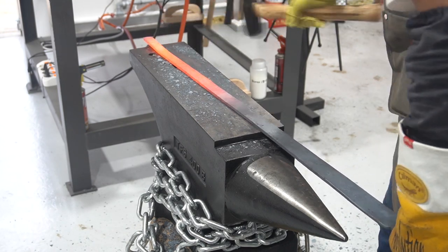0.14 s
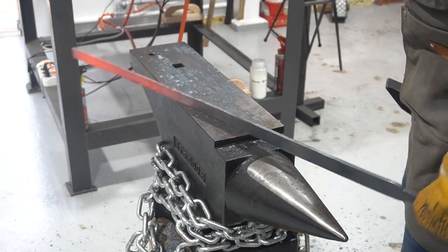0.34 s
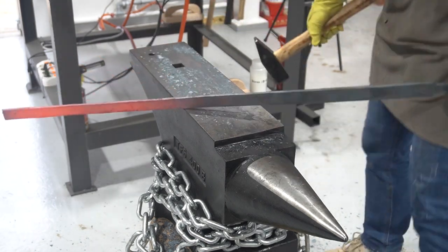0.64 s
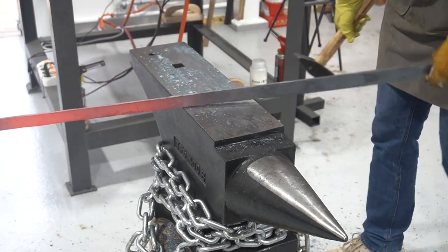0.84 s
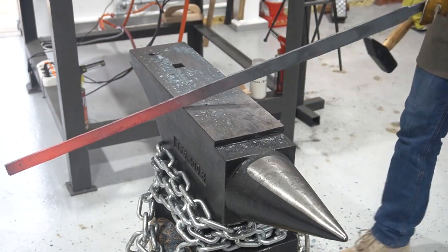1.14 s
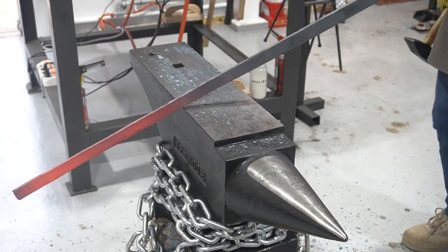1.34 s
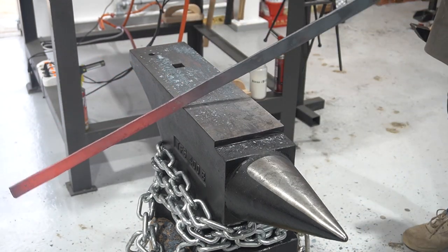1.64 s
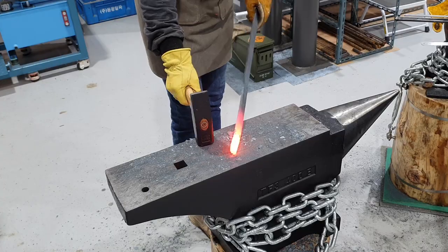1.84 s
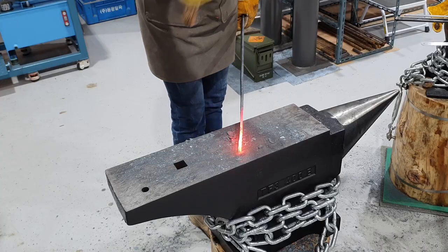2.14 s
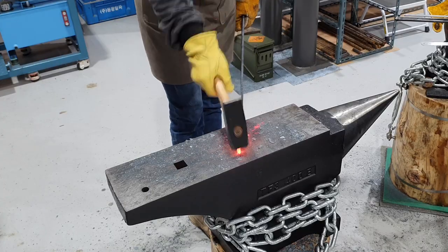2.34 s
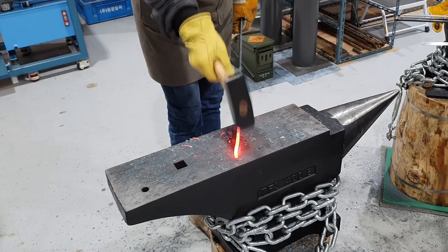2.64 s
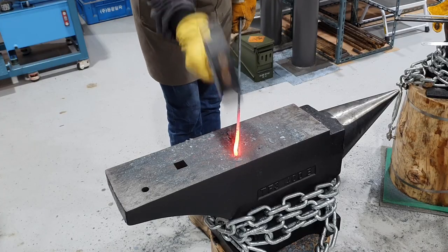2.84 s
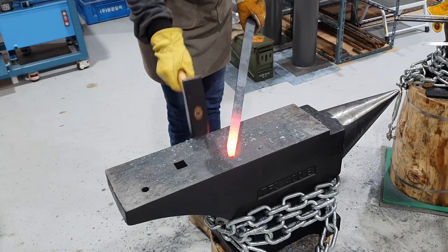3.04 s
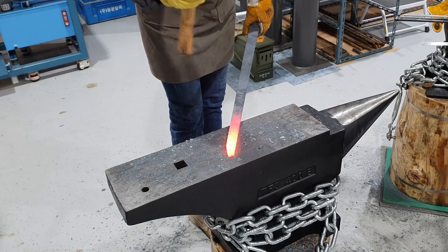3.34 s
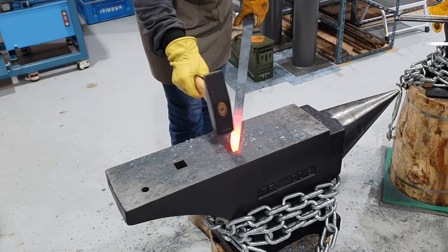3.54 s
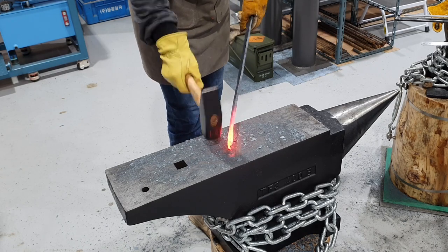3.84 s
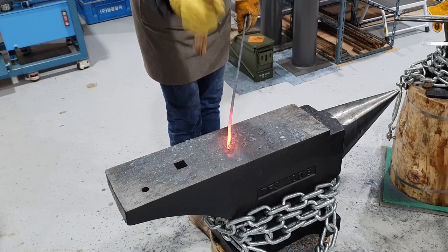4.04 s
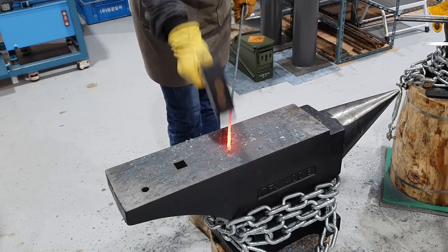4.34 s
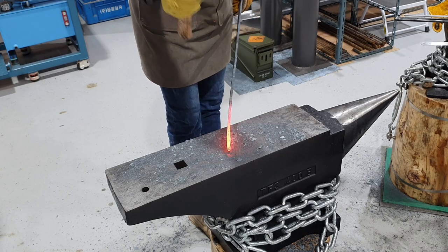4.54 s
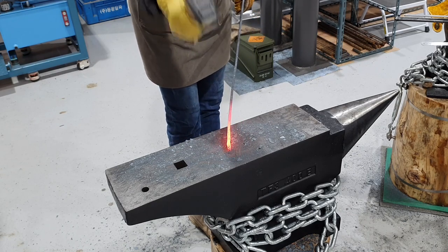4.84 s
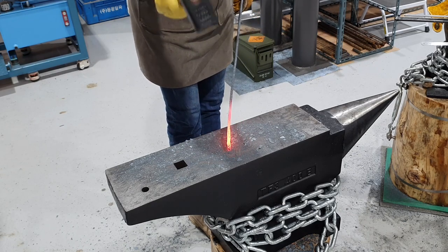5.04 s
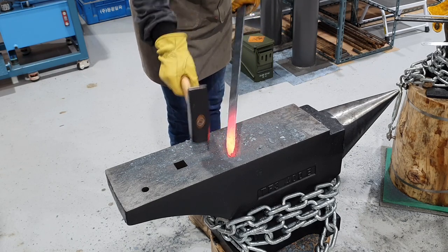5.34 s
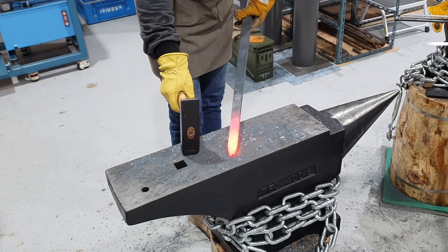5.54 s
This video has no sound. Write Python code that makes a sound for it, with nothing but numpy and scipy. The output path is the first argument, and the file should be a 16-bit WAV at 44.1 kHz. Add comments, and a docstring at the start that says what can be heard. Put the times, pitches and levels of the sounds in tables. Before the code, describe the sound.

A single bright hammer tap on a bare anvil rings through a hard-walled workshop and is chopped off. A gas forge roar swells alone, then the place switches abruptly: dry, damped blows on a hot bar come about four per second, with light taps on the anvil between runs, over cooling fans and a faint high electrical whine. Close microphone, the same in both channels.

```python
"""A hand hammer works a hot steel bar on a chained anvil in a bare workshop, two microphone places, one channel.
First place: the walls answer strongly; one ringing tap is cut short by a jump in time, the forge roar heard rising.
Second place: runs of blows on the bar and light taps on the anvil face, over cooling fans and a mains whine.
Strikes are a contact crack, decaying modes, noise clang and a stump thud, sent into echoes of banded noise;
forge and fans are coloured, flickering noise; the power supply is a repeated cycle of mains overtones."""
import sys
import numpy as np
from scipy import signal
from scipy.fft import rfft, irfft, next_fast_len
from scipy.io import wavfile
from scipy.ndimage import uniform_filter1d, minimum_filter1d

SR = 44100
rng = np.random.default_rng(int(sys.argv[2]) if len(sys.argv) > 2 else 0)


def pcm_store(signal):
    """Save signal as 16-bit PCM."""
    levels = np.round(np.clip(np.atleast_2d(signal), -1, 1) * 32767)
    wavfile.write(sys.argv[1], SR, levels.astype(np.int16).T)


N = 251370
T = np.arange(N) / SR  # [s]

# Blows on the hot bar: (time [s], crack peak [dB], crack pitch [Hz], anvil keynote [dB], anvil overtones [dB],
# overtone tilt [dB per octave], favoured overtones [Hz], clang re modes [dB])
BAR_BLOWS = [(2.3644, -9, 2520, -19, -22, 3, 12500, 7), (2.6366, 3, 2130, -13, -25, -2.1, 5500, 10.5),
             (2.9077, 1.1, 2160, -17, -22, 1.5, 5500, 6.5), (3.5091, 1.5, 2460, -11.5, -16, -1.5, 8000, 7),
             (4.1588, -9.5, 2170, -22, -22, 2.5, 11000, 4), (4.4186, -5.5, 2240, -13.5, -18, 5, 4100, 1.5),
             (4.6811, 2, 2500, -7, -17, -1.5, 5500, 3.5), (4.951, 0, 2390, -10, -21, -.6, 5500, 5),
             (5.217, 3, 2600, -6, -18, -2.5, 5600, 4.5)]
# Taps on the bare face: (time [s], crack peak [dB], anvil keynote [dB], anvil overtones [dB],
# overtone tilt [dB per octave], hammer head low modes [dB], hammer head high modes [dB])
FACE_TAPS = [(0.0074, 2.4, 0.9, -21.5, -.6, -16, -20), (3.1376, -4, -19.5, -27.5, -8, -10.5, -10.5),
             (3.682, -2.5, -22, -30, -9, -14, -11), (3.7579, -8.5, -16, -26.5, -3, -15, -20),
             (5.4439, -6.5, -25, -31, -9, -22.5, -14), (5.501, -17, -24.5, -47, -9, -24, -27)]
# Modes of the anvil with the bar on it, before each strike's levels: (frequency [Hz], level [dB], t60 [s])
ANVIL_MODES = [(2775, -18, .05), (3010, 0, .1), (3870, -13, .05), (4470, -7, .07), (5130, -6, .07),
               (5600, -12, .05), (5950, -6, .07), (6670, -9, .055), (7090, -13, .05), (7510, -7, .055),
               (8380, -10, .055), (8950, -10, .06), (9310, -8, .07), (10200, -7, .06), (10800, -9, .065),
               (11180, -10, .055), (12300, -14, .05), (12630, -13, .05), (13350, -14, .05),
               (14470, -10, .05), (15550, -9, .045)]
# Modes of the hammer head, before each strike's levels: (frequency [Hz], level [dB], t60 [s])
HEAD_MODES = [(4130, -11, .04), (5465, 0, .05), (6930, -5, .055), (7310, -9, .06), (8480, -17, .04),
              (9140, -15, .04)]
# Borders of the anvil's mode families, keynote family first: (frequency [Hz])
FAMILY_EDGES = [1600, 3400, 4800, 6300, 9700, 17000]
# Dense small modes of each family, heard as noise; the lowest re crack, the others re their modes: (level [dB])
CLANG_LEVELS = [-18, -13, -7.5, -9, -10.5]
# Resonances of stump and floor: (delay [s], frequency [Hz], level [dB], t60 [s])
STUMP_THUD = [(0.004, 134, -1.5, 0.086), (0.043, 208, 6.5, 0.044), (0.083, 150, -9.5, 0.098)]
# Echoes of the bare walls, before the wet level: (band centre [Hz], t60 [s], energy re direct [dB])
WALL_ECHOES = [(490, 0.34, -1.5), (1316, 0.68, -0.5), (3160, 0.82, -4.5), (5610, 0.69, -1.5),
               (10570, 0.6, 0.5)]
# Colour of the gas forge, relative: (frequency [Hz], level [dB per Hz])
FORGE_COLOUR = [(25, -27), (65, -46), (120, -28), (175, -34), (220, -17), (330, -14), (380, -5),
                (450, -9.5), (540, 1.5), (720, -5), (800, -12.5), (1870, -12.5), (3300, -25), (6500, -29),
                (7000, -31.5), (15700, -41.5)]
# Forge roar as heard at the first place: (time [s], level [dB])
FORGE_LEVEL = [(0.0, -27), (.33, -24.5), (.36, -21.5), (.9, -19), (1.74, -17.5)]
# Colour of the cooling fans, relative: (frequency [Hz], level [dB per Hz])
FAN_COLOUR = [(60, -49), (160, -23), (250, -14), (310, -4.5), (395, -1.5), (430, -10), (600, -5.5),
              (800, -10), (1200, -9.5), (1700, -14), (2400, -20.5), (3600, -25), (7000, -30), (11000, -37),
              (15700, -59)]
# Whole background, fans and whine, as heard at the second place; the fans' own level: (time [s], level [dB])
BACKGROUND_LEVEL = [(1.76, -30), (2.03, -29.5), (2.31, -26.5), (2.48, -26), (2.65, -26.5), (3.79, -30),
                    (4.24, -29), (4.41, -27), (5.36, -31), (5.7, -29.5)]
# Loudest mains overtones, as heard at WHINE_REF_S: (multiple of the mains [1], level [dB])
MAINS_OVERTONES = [(12, -50), (24, -47), (36, -56), (40, -57), (98, -62), (108, -58), (119, -52),
                   (120, -57), (121, -58), (122, -62), (123, -64)]

CUT_S = 1.7475  # the second place begins
JUMP_S, JUMP_FADE_S = 0.327, .012  # the jump in time fades out the first ring
BLOW_THUD_DB, BLOW_HEAD_DB = -21.5, -28  # every blow shakes the stump alike; the soft bar hardly rings the head
TAP_CRACK_HZ, TAP_CLANG_DB, TAP_THUD_DB = 3770, 9, -30  # clang re modes, thud re crack
HEAD_SPLIT_HZ = 6000  # flat and edge contact favour different modes of the head
TICK_HZ, TICK_DB = 12500, -2.5  # the hard edge of every contact, re the top modes and their clang
TILT_PIVOT_HZ = 6700
FAVOUR_DB, FAVOUR_OCTAVES = 6, .3  # the spot of the blow lifts one region of overtones
FIRST_WET_DB = 9.5  # echo level of the first place
BLOW_WET_DB, TAP_WET_DB = 0, -6.5  # echo levels of the second place; its taps are heard drier
FIRST_GAP_S, SECOND_GAP_S = 0.017, 0.014  # time until the walls answer
MAINS_HZ, COMB_DB = 59.775, -77  # all other overtones above 5 kHz, faint
TWELFTH_DB, NEIGHBOUR_DB = 8, 3  # every twelfth overtone and the ones beside it stand above the faint comb
WHINE_REF_S = 2.1
BASS_CUT_HZ, TOP_HZ = 93, 15750  # bass cut of the second place, top limit of both
FIRST_LIMIT_DB, LIMIT_DB, HOLD_S = 4, -.3, .003


def hammering():
    """Strikes on bar and face; the soft bar damps the hammer head, the bare face lets it ring."""
    blows = 0
    for s, crack_db, crack_hz, key_db, over_db, tilt, favoured_hz, clang_db in BAR_BLOWS:
        family_db = families(key_db, over_db, tilt, favoured_hz, FAVOUR_DB)
        direct = strike(crack_db, crack_hz, family_db, BLOW_HEAD_DB, BLOW_HEAD_DB, BLOW_THUD_DB, clang_db)
        blows = blows + place(s, direct, BLOW_WET_DB)
    taps = 0
    for s, crack_db, key_db, over_db, tilt, low_db, high_db in FACE_TAPS:
        family_db, thud_db = families(key_db, over_db, tilt), crack_db + TAP_THUD_DB
        direct = strike(crack_db, TAP_CRACK_HZ, family_db, low_db, high_db, thud_db, TAP_CLANG_DB)
        taps = taps + place(s, direct, TAP_WET_DB)
    jump = np.clip((JUMP_S - T) / JUMP_FADE_S + 1, 0, 1)
    return blows + taps * np.where(T < CUT_S, jump, 1)


def strike(crack_db, crack_hz, family_db, head_low_db, head_high_db, thud_db, clang_db):
    """Contact crack and tick, the damped rings and clang of anvil and hammer, the thud of the stump."""
    t = T[:SR // 3]
    cycles = crack_hz * t - 1  # the crack peaks one cycle in
    width = np.where(cycles < 0, .55, 1.)
    crack = undb(crack_db) * np.cos(2 * np.pi * cycles) * np.exp(-(cycles / width) ** 2)
    tick_noise = noise_band(t, TICK_HZ / 1.37, TICK_HZ * 1.42)
    tick = undb(family_db[-1] + clang_db + TICK_DB - 60 * t / 0.0051) * tick_noise
    metal = struck_modes(family_db, head_low_db, head_high_db, t) + clang(crack_db, family_db, clang_db, t)
    metal_onset = 1 - np.exp(-(t / .0009) ** 2)  # the steel needs about a millisecond to start ringing
    return crack + tick + metal * metal_onset + undb(thud_db) * stump(t)


def struck_modes(family_db, head_low_db, head_high_db, t):
    """Anvil and hammer head ring together, each group of modes at the level this strike gives it."""
    anvil, head = np.array(ANVIL_MODES), np.array(HEAD_MODES)
    anvil[:, 1] += family_db[np.searchsorted(FAMILY_EDGES, anvil[:, 0]) - 1]
    head[:, 1] += np.where(head[:, 0] < HEAD_SPLIT_HZ, head_low_db, head_high_db)
    return ring(np.vstack([anvil, head]), t)


def ring(modes, t):
    """Decaying modes; every strike shifts strengths, phases and pitches, strengths of high modes the most."""
    hz, db, t60 = np.transpose(modes)[:, :, None]
    chance = rng.standard_normal((3, len(modes), 1))
    strength = undb(db + (hz - 2000) / 4000 * chance[0] - 60 * t / t60)
    pitch = hz * (1 + .0012 * chance[1])
    return (strength * np.sin(2 * np.pi * pitch * t + 10 * chance[2])).sum(axis=0)


def families(keynote_db, overtones_db, tilt_db, favoured_hz=TILT_PIVOT_HZ, favour_db=0):
    """Level of each anvil mode family: the keynote, then overtones on a slope with one lifted region."""
    centre_hz = np.sqrt(np.multiply(FAMILY_EDGES[1:-1], FAMILY_EDGES[2:]))
    lift_db = favour_db * np.exp(-(np.log2(centre_hz / favoured_hz) / FAVOUR_OCTAVES) ** 2)
    slope_db = tilt_db * np.log2(centre_hz / TILT_PIVOT_HZ)
    return np.append(keynote_db, overtones_db + slope_db + lift_db)


def clang(crack_db, family_db, clang_db, t):
    """Modes too dense to tell apart: noise in each family's band, with a fast and a slow decay."""
    fade = undb(-60 * t / .025) + undb(-12 - 60 * t / .2)
    levels_db = np.append(crack_db, family_db[1:] + clang_db) + CLANG_LEVELS
    out = 0
    for lo, hi, db in zip(FAMILY_EDGES, FAMILY_EDGES[1:], levels_db):
        out = out + undb(db) * fade * noise_band(t, lo, hi)
    return out


def stump(t):
    """Stump and floor: a low noise rumble and delayed, decaying resonances with soft onsets."""
    thud = undb(-8 - 60 * t / .35) * noise_band(t, 90, 260) * (1 - np.exp(-t / .015))
    for delay, hz, db, t60 in STUMP_THUD:
        late = np.maximum(t - delay, 0)
        tone = undb(db - 60 * late / t60) * np.sin(2 * np.pi * hz * late)
        thud = thud + tone * (1 - np.exp(-late / 0.0044))
    return thud


def place(s, direct, wet_db):
    """One strike at its time, with echoes drawn afresh; the first place hears more of the walls."""
    gap_s = SECOND_GAP_S
    if s < CUT_S:
        wet_db, gap_s = FIRST_WET_DB, FIRST_GAP_S
    return np.pad(workshop(direct, wet_db, gap_s), (int(s * SR), N))[:N]


def workshop(x, wet_db, gap_s):
    """The direct sound and dense echoes of bare walls, each band dying at its own rate."""
    t = T[:SR // 2]
    echoes, noise = (t == 0) * 1., rng.standard_normal(len(t))
    onset = np.clip(t / gap_s - .5, 0, 1)
    for hz, t60, db in WALL_ECHOES:
        tail = band(noise, hz / 1.55, hz * 1.55) * undb(-60 * t / t60) * onset
        share = np.sqrt(2 * hz / SR)  # part of a click's energy in this band
        echoes = echoes + undb(db + wet_db) * share * tail / np.sqrt(np.sum(tail ** 2))
    return signal.fftconvolve(x, echoes)


def forge():
    """Roar of the gas forge at the first place: coloured noise, heard rising after the strike."""
    return undb(curve(FORGE_LEVEL)) * air_noise(FORGE_COLOUR, swell_db=.4, flicker_db=1.1)


def background():
    """Fans as coloured noise and a steady mains whine at the second place, both moved by one level curve."""
    level = curve(BACKGROUND_LEVEL)
    fans = undb(level) * air_noise(FAN_COLOUR, swell_db=.6, flicker_db=1.1)
    return fans + undb(level - level[int(WHINE_REF_S * SR)]) * whine()


def air_noise(spectrum, swell_db, flicker_db):
    """Coloured noise in octave bands that swell together and flicker alone."""
    size = next_fast_len(N)
    octave = np.log2(np.maximum(np.fft.rfftfreq(size, 1 / SR), 1))
    hz, db = np.transpose(spectrum)
    colour = undb(np.interp(octave, np.log2(hz), db))
    noise = colour * rfft(rng.standard_normal(size))
    out, swell = 0, walk(1.92)
    for centre in np.arange(4, 15):  # 16 Hz to 16 kHz, overlapping triangles
        octave_band = irfft(noise * np.clip(1 - abs(octave - centre), 0, 1), size)[:N]
        out = out + octave_band * undb(swell_db * swell + flicker_db * walk(9))
    return unit(out)


def whine():
    """Steady overtones of the mains from a rectifier: one cycle, repeated."""
    orders = np.arange(262)
    chance = rng.standard_normal((len(orders), 2))
    db = np.where(orders > 84, COMB_DB + 3 * chance[:, 0], -200)
    db += TWELFTH_DB * (orders % 12 == 0)
    db += NEIGHBOUR_DB * (abs((orders + 6) % 12 - 6) == 1)
    loudest = np.array(MAINS_OVERTONES)
    db[loudest[:, 0]] = loudest[:, 1]
    cycle = np.arange(8192) / 8192
    overtones = np.sin(2 * np.pi * orders[:, None] * cycle + 10 * chance[:, 1:])
    shape = np.sqrt(2) * undb(db) @ overtones  # levels are RMS
    return np.interp(MAINS_HZ * T % 1, cycle, shape, period=1)


def undb(db):
    """Decibels to amplitude."""
    return 10 ** (np.asarray(db) / 20)


def unit(x):
    """Scale to an RMS of 1."""
    return x / np.sqrt(np.mean(x ** 2))


def curve(rows):
    """Straight lines between (time [s], level [dB]) points."""
    return np.interp(T, *np.transpose(rows))


def walk(rate):
    """Random levels held 1 / rate s and slewed twice; spread near 1."""
    k = int(SR / rate)
    steps = np.repeat(rng.standard_normal(N // k + 1), k)
    return 1.3 * uniform_filter1d(uniform_filter1d(steps, k), k)[:N]


def band(x, lo_hz, hi_hz):
    """Band-pass filter."""
    sos = signal.butter(2, [lo_hz, min(hi_hz, .45 * SR)], "band", fs=SR, output="sos")
    return signal.sosfilt(sos, x)


def noise_band(t, lo_hz, hi_hz):
    """Fresh noise in one band, at an RMS of 1."""
    return unit(band(rng.standard_normal(len(t)), lo_hz, hi_hz))


def scene():
    """Hammering through both places, forge behind the first, fans and whine behind the second."""
    mono = hammering() + np.where(T < CUT_S, forge(), background())
    return np.array([mono, mono])


def record(dry):
    x, first, hold = dry[0], T < CUT_S, int(HOLD_S * SR)
    bass_cut = signal.butter(4, BASS_CUT_HZ, "high", fs=SR, output="sos")
    heard = np.where(first, x, signal.sosfilt(bass_cut, x * ~first))
    limit = undb(np.where(first, FIRST_LIMIT_DB, LIMIT_DB))
    gain = np.minimum(1, limit / (abs(heard) + 1e-9))
    gain = uniform_filter1d(minimum_filter1d(gain, hold), hold // 2)  # looks ahead
    late_gain = np.roll(gain, hold // 2)  # late in the first place, so the crack slips through
    heard = np.clip(heard * np.where(first, late_gain, gain), -1, 1)
    top_limit = signal.ellip(10, .2, 70, TOP_HZ, fs=SR, output="sos")
    return signal.sosfilt(top_limit, [heard, heard])


dry = scene()
out = record(dry)
pcm_store(out)
```